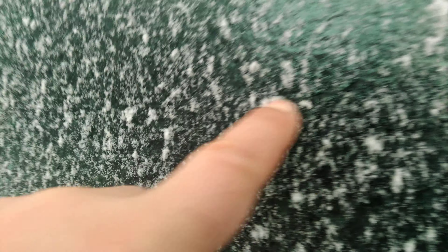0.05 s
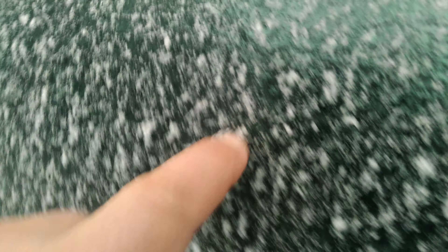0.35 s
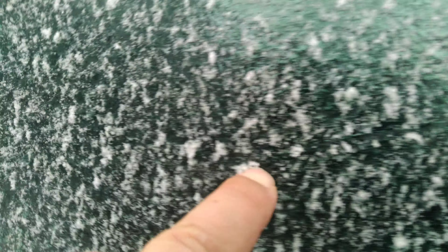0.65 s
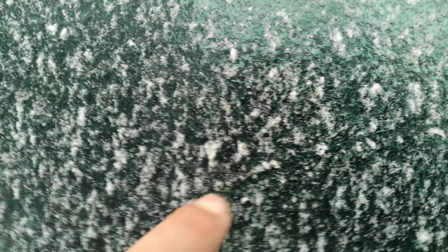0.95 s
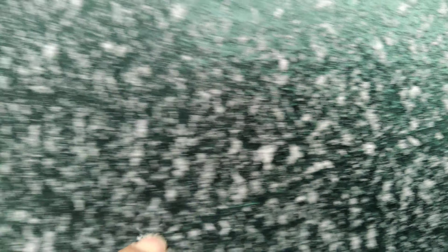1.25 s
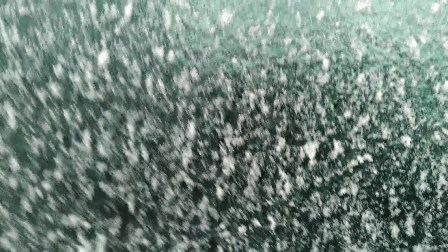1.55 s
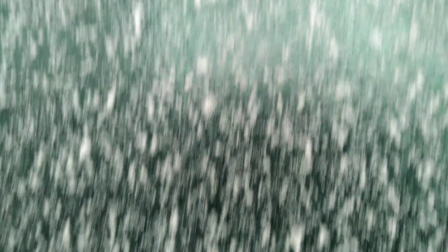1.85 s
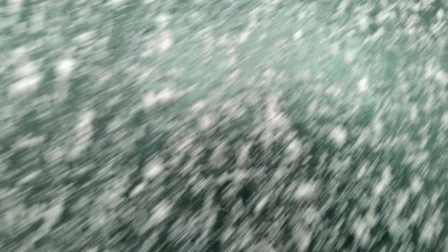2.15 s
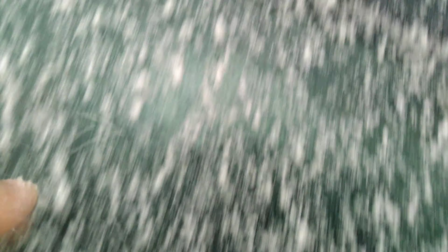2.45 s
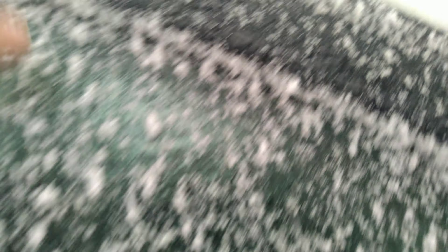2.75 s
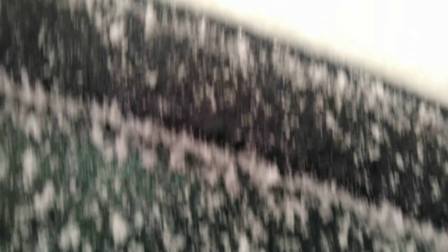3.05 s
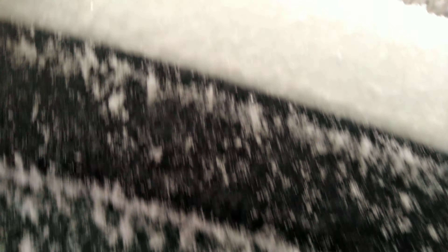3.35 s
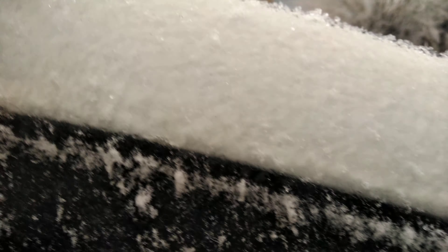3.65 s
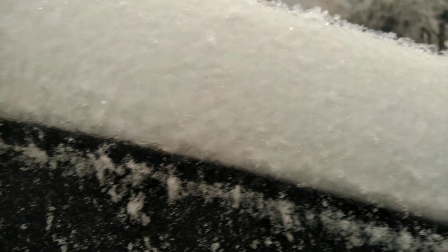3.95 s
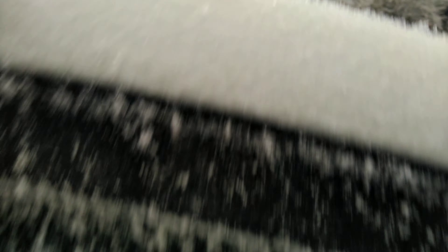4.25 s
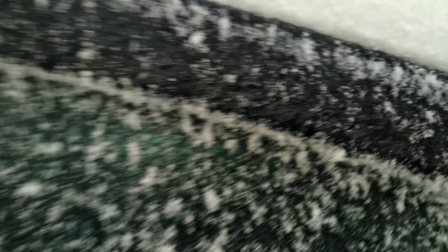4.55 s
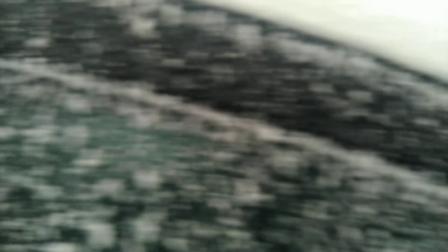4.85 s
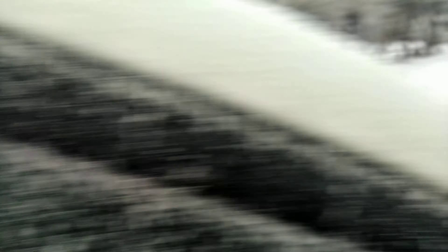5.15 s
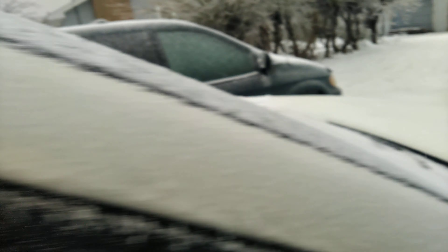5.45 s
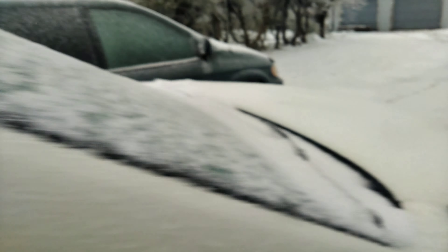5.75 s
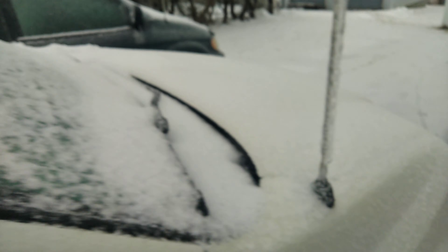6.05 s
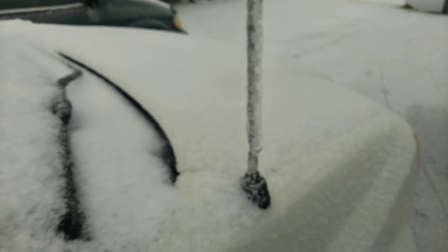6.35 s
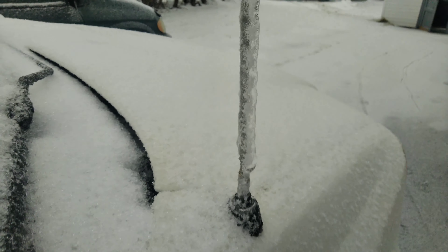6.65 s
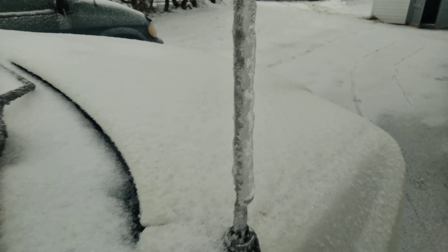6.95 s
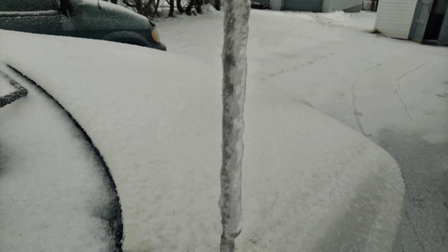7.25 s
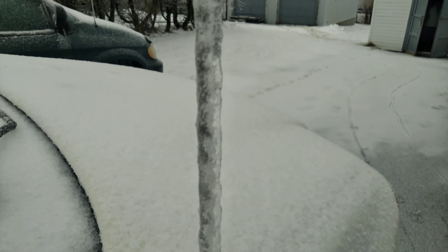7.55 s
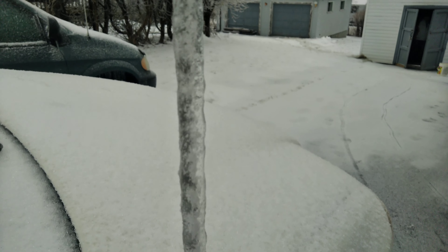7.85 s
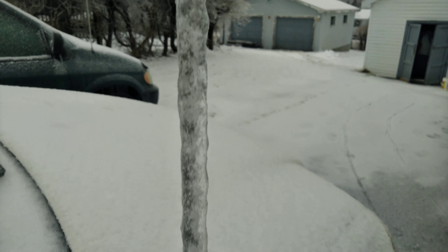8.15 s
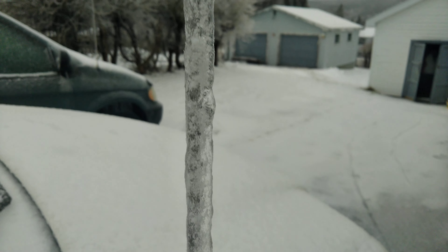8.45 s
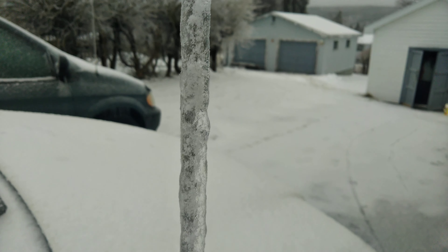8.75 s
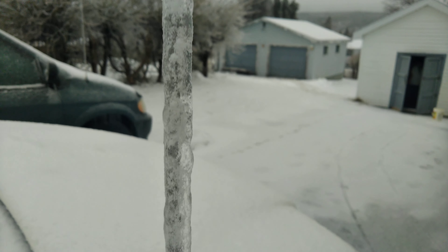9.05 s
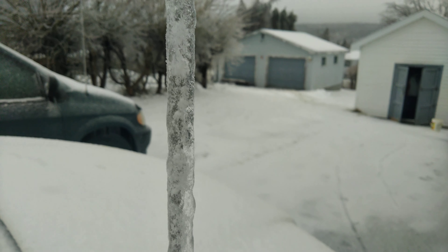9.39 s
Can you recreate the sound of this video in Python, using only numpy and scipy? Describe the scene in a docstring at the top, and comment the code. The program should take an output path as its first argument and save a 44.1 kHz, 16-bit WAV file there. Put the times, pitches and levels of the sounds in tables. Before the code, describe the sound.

A finger scratches crackling ice on a car windscreen, making the glass boom dully, while freezing rain ticks and hisses all around.

```python
"""At the iced windscreen of a parked car in freezing rain, heard from a phone held close to the glass.
Ice pellets click on the crust and tap the bodywork, over a fine patter of countless far impacts.
At first a finger scratches the crust, and its stick-slip friction sets the pane booming. Brittle ice
ticks and snaps close by, a hand brushes and bumps the case, and later a sleeve slides past the right
microphone port. Eddies of a light wind rumble throughout."""
import sys
import numpy as np
from scipy import signal
from scipy.fft import rfft, irfft, next_fast_len
from scipy.io import wavfile
from scipy.ndimage import uniform_filter1d

SR = 44100
rng = np.random.default_rng(int(sys.argv[2]) if len(sys.argv) > 2 else 0)


def master_out(mix):
    """Clip the mix to full scale and print it as 16-bit PCM to the path in sys.argv[1]."""
    frames = np.transpose(np.atleast_2d(mix))
    ceiling = np.clip(frames, -1, 1)
    pcm = np.round(ceiling * 32767).astype(np.int16)
    wavfile.write(sys.argv[1], SR, pcm)


N = 415410
TIME = np.arange(N) / SR
TEN_MS = SR // 100


def undb(db):
    """Decibels to amplitude ratio. Levels in the tables are relative: each source adds its own gain."""
    return 10 ** (np.asarray(db) / 20)


def curve(table):
    """Linear interpolation of (seconds, value) rows over the whole scene."""
    return np.interp(TIME, *np.transpose(table))


def unit(x):
    """Normalisation to rms 1."""
    return x / np.sqrt(np.mean(x ** 2))


def impulse_level(x, db):
    """Energy normalisation: a short sound, spread over 10 ms, takes this level."""
    return x * undb(db) * np.sqrt(TEN_MS / np.mean(np.sum(x ** 2, axis=-1)))


def pan(db):
    """Constant-power gains for a balance, the left level minus the right, in dB."""
    return unit(undb(np.array([[db], [-db]]) / 2))


def colour(x, points):
    """Minimum-phase filter with the given (Hz, dB) response, made by folding the cepstrum."""
    hz, db = np.transpose(points)
    size = 2 * next_fast_len(x.shape[-1])
    log_hz = np.log(np.fft.rfftfreq(size, 1 / SR) + 1)
    cepstrum = irfft(np.log(undb(np.interp(log_hz, np.log(hz), db))))
    cepstrum[1:size // 2] *= 2
    cepstrum[size // 2 + 1:] = 0
    return irfft(rfft(x, size) * np.exp(rfft(cepstrum)))[..., :x.shape[-1]]


def wander(rate):
    """Smooth random modulation of rms 1, with `rate` new values a second."""
    hold = int(SR / rate)
    steps = np.repeat(rng.standard_normal(N // hold + 1), hold)
    return unit(uniform_filter1d(uniform_filter1d(steps, hold), hold)[:N])


def swell(start, hold, attack_s, release_s):
    """Envelope of linear rise, plateau and exponential decay."""
    age = TIME - start
    return np.clip(age / attack_s, 0, 1) * np.exp(-np.maximum(age - attack_s - hold, 0) / release_s)


def add(out, start, sound):
    """Superposition of a short sound from `start` seconds on."""
    i = int(np.clip(start * SR, 0, N - 1))
    out[:, i:i + sound.shape[-1]] += sound[..., :N - i]


def grains(rate, spread_db, tail_s, tail_db):
    """Shot noise: random impacts, mostly small, each with its own strength and scatter at each port."""
    size = (rng.random(N) < rate / SR) * undb(spread_db * np.minimum(rng.exponential(size=N), 4))
    hits = size * rng.choice([-1, 1], N) * undb(6.7 * rng.standard_normal((2, N)))
    decay = np.exp(-1 / (tail_s * SR))
    scatter = np.sqrt(signal.lfilter([1 - decay], [1, -decay], hits ** 2 + 1e-18))
    return unit(hits + undb(tail_db) * scatter * rng.standard_normal((2, N)))


def shifting_resonances(x, spread_db):
    """Random filtering: every few milliseconds another fragment sounds, with resonances of its own."""
    spectra = signal.stft(x, nperseg=256)[2]
    peaks = unit(uniform_filter1d(rng.standard_normal(spectra.shape[1:]), 4, axis=0))
    return signal.istft(spectra * undb(spread_db * peaks), nperseg=256)[1][:, :N]


# The patter, weaker as the phone is lifted from the glass. Each row: time in seconds, level in dB.
PATTER_LEVEL = [(0, -56.5), (2.85, -55.5), (3.5, -53.5), (5.3, -56), (5.9, -56.5), (8, -58.5), (9.4, -58)]
# Spectrum of the patter. Each row: frequency in Hz, spectral level in dB.
PATTER_SPECTRUM = [(200, 7), (400, 12.5), (800, 6.5), (1500, 6.5), (3000, 5), (6000, 3.5), (10000, 6),
                   (15500, 9.5)]


def patter(level_db=-3.5):
    """Incoherent summation: countless far pellets merge into a smooth hiss."""
    far = grains(rate=2500, spread_db=2.8, tail_s=0.0033, tail_db=9)
    hiss = unit(colour(far, PATTER_SPECTRUM))
    return hiss * undb(level_db + wander(7.4) + curve(PATTER_LEVEL)) * pan(-1.3)


# Gusts on the ports. Each row: time of the peak in seconds, half length in seconds, level in dB.
GUSTS = [(0.186, 0.076, -41.5), (0.69, 0.17, -44.5), (1.504, 0.33, -51), (2.496, 0.18, -50.5),
         (3.502, 0.4, -57.5), (4.19, 0.19, -50.5), (4.89, 0.35, -55.5), (6.72, 0.2, -52.5),
         (7.11, 0.1, -50), (7.757, 0.25, -56.5), (8.374, 0.14, -46), (8.77, 0.15, -50)]
# Spectrum of the eddies. Each row: frequency in Hz, spectral level in dB.
WIND_SPECTRUM = [(12, 0.5), (25, 2.5), (50, -1.5), (90, -9.5), (180, -26), (400, -62), (1500, -68)]


def wind(breeze_db=-64, flutter_db=4.5):
    """Turbulent pressure: eddies buffet each port independently and swell in gusts."""
    gust_power = sum(undb(db) ** 2 * np.exp(-((TIME - peak) / half) ** 2) for peak, half, db in GUSTS)
    strength = np.sqrt(undb(breeze_db) ** 2 + gust_power)
    eddies = unit(colour(rng.standard_normal((2, N)), WIND_SPECTRUM))
    return eddies * strength * undb(flutter_db * wander(6.5)) * pan(-8)


# Spectrum of the far neighbourhood. Each row: frequency in Hz, spectral level in dB.
MURMUR_SPECTRUM = [(30, 1), (70, 1), (120, 3), (200, -7.5), (350, -11.5), (700, -15), (1500, -42),
                   (4000, -71), (15000, -72)]


def neighbourhood(level_db=-66):
    """Coherence: a distant low murmur reaches both ports with nearly the same waveform."""
    noise = rng.standard_normal(N) + 0.13 * rng.standard_normal((2, N))
    return unit(colour(noise, MURMUR_SPECTRUM)) * undb(level_db) * pan(-3.5)


# Modes of the windscreen. Each row: frequency in Hz, level in dB, time to fall 60 dB in seconds.
PANE_MODES = [(84, -17, 0.11), (115.7, -2.5, 0.17), (131.9, -2, 0.19), (170, -7.5, 0.052),
              (190.6, 0, 0.082), (243, -10, 0.035), (304, -13, 0.058), (380, -7.5, 0.11),
              (437, -2.5, 0.065), (529, -4, 0.032), (590, -4, 0.054), (674, -8, 0.056), (798, -5, 0.043),
              (1070, 1, 0.031)]
# The boom deepens as the finger moves on. Each row: time in seconds, tilt in dB per octave.
BOOM_TILT = [(1.6, 3), (2.2, -9.5)]


def pane(start, scatter_db, hollow_hz, falloff_db_per_octave=10, left_lag_s=0.00038):
    """Modal response: a deep boom, and a hollow ring of the upper modes that the touched spot favours."""
    hz, db, t60 = np.transpose(PANE_MODES)
    upper = hz > 330
    db = db + scatter_db * rng.standard_normal(len(hz))
    db -= upper * falloff_db_per_octave * np.abs(np.log2(hz / hollow_hz))
    db += ~upper * np.interp(start, *np.transpose(BOOM_TILT)) * np.log2(hz / np.mean(hz[~upper]))
    age = np.maximum(np.arange(20 * TEN_MS) / SR - np.array([[left_lag_s], [0]]), 0)
    rings = np.array([np.sin(2 * np.pi * f * age) * undb(level) * np.exp(-np.log(1000) * age / decay)
                      for f, level, decay in zip(hz, db, t60)])
    # deep bass barely radiates
    rings = signal.sosfilt(signal.butter(2, 100, "high", fs=SR, output="sos"), rings)
    return rings[~upper].sum(axis=0), rings[upper].sum(axis=0)


# Strokes of the fingertip. Each row: start in seconds, hold in seconds, crunch level in dB,
# rub level in dB, judder depth in dB, centre of the hollow ring in Hz.
STROKES = [(0, 0.178, -48.5, -40, -0.5, 490), (0.242, 0.27, -48, -43, 1.5, 620),
           (0.508, 0.075, -50, -55, 8, 500), (0.64, 0.12, -49.5, -60.5, 0.5, 600),
           (0.766, 0.19, -44, -43, 6, 604), (0.974, 0.12, -50, -44, 0, 515),
           (1.113, 0.053, -45, -42, 4.5, 504), (1.188, 0.015, -41, -37, 6, 500),
           (1.231, 0.054, -47, -40.5, -2, 500), (1.297, 0.11, -54.5, -44.5, 1, 520),
           (1.405, 0.069, -43, -44.5, -2, 500), (1.528, 0.022, -52, -40, 1, 520),
           (1.611, 0.008, -53, -46, 7, 560), (1.667, 0.06, -53.5, -46.5, 0, 560),
           (1.734, 0.065, -60, -51.5, 7, 600), (1.906, 0.049, -45, -44.5, 10, 550),
           (2.069, 0.012, -63, -42, 10, 576), (2.103, 0.025, -44.5, -40, 2.5, 560),
           (2.15, 0.011, -45, -40, 0.5, 500), (2.182, 0.006, -61, -46, 7, 560),
           (2.203, 0.0096, -44.5, -41, 8, 560), (2.235, 0.13, -44.5, -36.5, 4, 546),
           (2.379, 0.011, -59, -36, 3, 550), (2.44, 0.014, -49, -38, 2, 450),
           (2.49, 0.052, -48, -37.5, 7, 397), (2.592, 0.13, -48.5, -38, 5.5, 400),
           (3.165, 0.021, -50, -68, 10, 400), (3.41, 0.017, -46.5, -69, 8, 402),
           (3.711, 0.069, -49, -59, 1, 400), (4.379, 0.018, -52, -73, -1, 396)]
# Dry hiss of skin gliding over ice. Each row: time in seconds, level in dB.
GLIDE_LEVEL = [(0, -50), (0.5, -45.5), (0.62, -51), (0.66, -44.5), (0.94, -48.5), (1.05, -80), (1.4, -51),
               (1.5, -69), (1.73, -58), (1.85, -81), (2.05, -68), (2.12, -81), (2.38, -65), (2.42, -80),
               (2.7, -67), (2.85, -99)]
# Spectra of the crunch and the glide. Each row: frequency in Hz, spectral level in dB.
CRUNCH_SPECTRUM = [(60, 5), (200, 15), (600, 2.7), (1200, 3), (3000, 5), (6000, 4.1), (10000, 3.4),
                   (15500, 2.3)]
GLIDE_SPECTRUM = [(200, -4), (1000, -3), (2500, -1), (4500, 4), (8500, 3), (15500, 2)]


def finger(crunch_db=-2, rub_db=-4, hollow_db=-1.5, judder_per_s=70, attack_s=0.0011, release_s=0.014):
    """Stick-slip friction: a fingertip hisses, breaks grains of crust and drives the pane's modes."""
    out = np.zeros((2, N))
    breaking = grains(rate=1700, spread_db=2.05, tail_s=0.003, tail_db=-0.51)
    crunch = colour(shifting_resonances(breaking, 4.7), CRUNCH_SPECTRUM)
    slips = grains(rate=1100, spread_db=1.4, tail_s=0.0018, tail_db=-7)[:1]
    # one contact makes crunch, rub and hiss, so they judder together
    judder = np.tanh(wander(judder_per_s)) + np.tanh(wander(4 * judder_per_s))
    for start, hold, crust_db, glass_db, judder_db, hollow_hz in STROKES:
        span = (TIME >= start) & (TIME < start + hold + 4 * release_s)
        grip = undb(judder_db * judder[span])
        deep, hollow = pane(start, 0, hollow_hz)
        response = deep + undb(hollow_db) * hollow
        rub = signal.fftconvolve(slips[:, span] * grip ** 0.38, response)[:, :len(grip)]
        crust = unit(crunch[:, span] * grip) * undb(crust_db + crunch_db)
        glass = unit(rub) * undb(glass_db + rub_db) * pan(-2.5)
        add(out, start, (crust + glass) * swell(start, hold, attack_s, release_s)[span])
    gliding = grains(rate=4000, spread_db=3.6, tail_s=0.0012, tail_db=1)
    hiss = unit(colour(shifting_resonances(gliding, 2.8), GLIDE_SPECTRUM))
    return out + hiss * undb(curve(GLIDE_LEVEL) + 2.7 * judder)


def faint_pellets(per_s=95, top_db=1, range_db=12):
    """Random arrivals: many fainter pellets whose level follows the patter, as rows like PELLETS."""
    when, small, bright, side = rng.random((int(per_s * N / SR), 4)).T
    db = curve(PATTER_LEVEL)[(when * (N - 1)).astype(int)] + top_db - range_db * np.sqrt(small)
    tilt_db = 2.5 + 8 * (2 * bright - 1)
    pan_db = -8.5 + 8 * (2 * side - 1)
    return list(zip(when * TIME[-1], db, tilt_db, pan_db))


# The clearest pellets landing on the crust. Each row: start in seconds, level in dB,
# tilt in dB per octave, balance in dB.
PELLETS = [(2.7964, -53.5, -8, 0), (3, -52.5, -1, -8), (3.05, -54, -3.5, -9), (3.1352, -46.5, -3, -4),
           (3.2807, -46.5, 0.5, 2), (3.503, -54, 2, -1.0), (3.5144, -46, 2, 4), (3.6858, -53, 8, 6),
           (3.736, -47, -1, -5), (3.7736, -46, 9, 2.0), (3.783, -51, 1, -5), (3.794, -55, 0, -9),
           (3.8653, -55.5, 3, -3), (3.8756, -49.5, 6, 3), (4.021, -49.5, 1.5, -10), (4.0307, -51, -5.5, -1),
           (4.1065, -51, -3, -8.0), (4.1603, -42.5, -1.5, -1), (4.2368, -48, 9, -9), (4.246, -52, 7, 2),
           (4.2985, -45, 0, -7), (4.4175, -47.5, 3, 9), (4.4584, -47.5, 1.5, -5), (4.5467, -51, 5, -5),
           (4.6428, -50.5, 4.5, -2), (4.7208, -52.5, 1.5, -4), (4.7773, -53, -2.5, -1),
           (4.828, -47, 1.5, -3), (4.9311, -50, -2.5, -6), (4.94, -50, 2, -2.0), (5.0918, -47, 4, -5),
           (5.121, -52, -1, -5), (5.2303, -52.5, 18, -4), (5.2384, -50, 1, -3), (5.2664, -45, 0, -8),
           (5.3196, -49.5, -2, -10), (5.3561, -50, 8, -13.0), (5.3886, -51, -2.5, -8),
           (5.4037, -46, 1.5, -5), (5.5672, -54, 3, -5), (5.801, -53, 1.5, -2), (5.9957, -52, -3.5, -5),
           (6.0196, -49, 0.5, -11), (6.063, -51, 0.5, -9), (6.1969, -48.5, 4, -6.0),
           (6.2616, -50, 3.5, -13), (6.2742, -45.5, -2, -6), (6.3134, -52, -2, -7), (6.364, -57, -5.5, -10),
           (6.7363, -48.5, 2, -11), (6.9055, -46.5, -1, -8), (6.9787, -44, 1.5, -12), (7.088, -49, 2, -7),
           (7.244, -51, 15, -10.0), (7.386, -53, -5, 1), (7.406, -50, -1, -9), (7.551, -51, 0.5, -9.0),
           (7.742, -52.5, -2.5, -6), (7.7673, -52, 2.5, -9), (7.904, -54.0, -1.5, -7),
           (8.0005, -53, 3, -6.0), (8.013, -51, -0.5, -11), (8.173, -51, 14, -8), (8.2801, -49, -1.5, -10),
           (8.482, -49.5, -2, -3.5), (8.5581, -47, -0.5, -6), (8.712, -50.5, -2.5, -8),
           (8.7888, -54, -2, -2.0), (8.9277, -52.5, -2.5, -6), (9.006, -51, -2.5, -4), (9.1256, -51, 1, -9),
           (9.2047, -51, -2, -9), (9.2508, -54, -5, -6.0), (3.8118, -54.5, 10, -13), (3.9417, -62, 7, -9),
           (4.055, -58, 19, -6), (4.176, -53, -2, -10), (4.5328, -54.5, 2.5, -11), (4.9617, -53, 1, -5),
           (4.9985, -54, 7, -13), (5.5755, -53, 11, -4), (5.615, -53.5, 6, -14), (5.7603, -57, 4, -12),
           (7.803, -54, 3.5, -7), (8.0305, -52.5, 0.5, -12), (8.0383, -52.5, -2.5, -2),
           (8.433, -52.5, 1.5, -8), (8.5022, -56, 5, -14), (8.7762, -55, 0, -13), (8.8445, -53, 7, -15)]
# Spectrum of a nearby pellet. Each row: frequency in Hz, spectral level in dB.
PELLET_SPECTRUM = [(150, -16.5), (600, -6.5), (1200, -1.5), (2000, -1.5), (3200, -0.5), (5500, 1.5),
                   (9000, 2), (14000, -1.5), (20000, -36)]


def pellets(level_db=1, contact_s=0.00047, scatter_s=0.0053, ring_hz=3600, cycles=0.99, bounce_db=-13):
    """Inelastic impact: each pellet gives a dry click, a brief ring, scattered crumbs and one bounce."""
    out, t = np.zeros((2, N)), np.arange(TEN_MS) / SR
    hz, spectrum_db = np.transpose(PELLET_SPECTRUM)
    octaves = np.log2(np.clip(hz, 1200, 10000) / 3000)
    for start, db, tilt_db, pan_db in PELLETS + faint_pellets():
        click = rng.standard_normal((2, len(t))) * np.sqrt(t) * np.exp(-t / contact_s)
        scatter = rng.standard_normal((2, len(t))) * np.exp(-t / scatter_s)
        shape_db = spectrum_db + tilt_db * octaves + 4.5 * rng.standard_normal(len(hz))
        # the duller the pellet, the lower it rings
        pitch = np.clip(ring_hz * 2 ** (tilt_db / 6 + 0.44 * rng.standard_normal()), 1200, 10000)
        ring = np.sin(2 * np.pi * (pitch * t + rng.random((2, 1)))) * np.exp(-t * pitch / cycles)
        impact = impulse_level(click, 0) + impulse_level(ring, -6) + impulse_level(scatter, -7)
        impact = colour(impact, np.column_stack([hz, shape_db]))
        impact = impulse_level(impact, db + level_db) * pan(pan_db)
        add(out, start, impact)
        add(out, start + 0.004 + 0.021 * rng.random(), impact * undb(bounce_db))
    return out


def faint_taps(per_s=6.3, level_db=-7.5, ring_hz=1850):
    """Jittered arrivals: one weaker tap in each equal slot of time, as rows like BODYWORK_TAPS."""
    count = round(TIME[-1] * per_s)
    starts = TIME[-1] * (np.arange(count) + rng.random(count)) / count
    size, pitch, side = rng.standard_normal((count, 3)).T
    db = curve(PATTER_LEVEL)[(starts * SR).astype(int)] + level_db + 3 * size
    return list(zip(starts, db, ring_hz * 2 ** (0.28 * pitch), -7 + 5 * side))


# The loudest pellets on the bodywork. Each row: start in seconds, level in dB, ring frequency in Hz,
# balance in dB.
BODYWORK_TAPS = [(3.0935, -46.5, 1410, -5), (2.127, -50, 1850, 0), (4.89, -54, 1400, -8),
                 (3.7671, -45.5, 1777, -16), (4.7419, -45, 1480, -17), (4.861, -47, 2070, 2),
                 (4.9515, -44, 1780, 4), (5.273, -52, 1320, -5), (6.0135, -48, 1280, -6),
                 (6.4272, -41, 1500, -1.5), (6.551, -47.5, 1990, -8), (6.664, -40, 1030, -3),
                 (6.7863, -45, 1230, -4), (6.87, -49, 1620, -3.5), (6.962, -46, 1460, -4),
                 (7.535, -45.5, 2480, -10), (7.9827, -45.5, 1480, -4), (8.652, -46.5, 2940, -1),
                 (8.939, -49, 1750, -12)]


def bodywork_taps(level_db=-1, cycles=1.65, click_db=-3, click_s=0.002, left_lag_s=0.00033):
    """Damped oscillation: a pellet clicks on snow-damped metal, whose ring fades in a cycle or two."""
    out, t = np.zeros((2, N)), np.arange(TEN_MS) / SR
    age = np.maximum(t - np.array([[left_lag_s], [0]]), 0)
    for start, db, hz, pan_db in BODYWORK_TAPS + faint_taps():
        ring = np.sin(2 * np.pi * hz * age) * np.exp(-age * hz / cycles)
        click = rng.standard_normal(ring.shape) * np.exp(-t / click_s)
        tap = impulse_level(ring, db + level_db) + impulse_level(click, db + click_db)
        add(out, start, tap * pan(pan_db))
    return out


# The nail catches hard on the crust. Each row: release time in seconds, boom level in dB,
# knock level in dB, centre of the knock in Hz, rasp level in dB.
NAIL_CATCHES = [(0.143, -41, -45, 650, -43.5), (0.214, -45, -43, 560, -48), (0.287, -66, -42.5, 660, -44),
                (0.311, -65, -43, 600, -40), (0.411, -39.5, -47, 600, -42), (0.45, -43, -36.5, 600, -49),
                (0.46, -34.5, -39, 630, -39.5), (0.762, -29.5, -33.5, 520, -36.5),
                (0.79, -38, -45, 598, -36), (0.857, -46, -38, 700, -36.5), (1.123, -41.5, -55, 590, -40.5),
                (1.205, -40, -40.5, 503, -39), (1.273, -47, -45, 497, -41), (1.345, -49, -45, 520, -46),
                (1.404, -49, -45, 560, -56), (1.44, -29, -34, 454, -40.5), (1.455, -33, -36.5, 600, -43),
                (1.542, -45, -43, 500, -43), (1.551, -41, -35, 510, -39), (1.576, -52, -53, 520, -50),
                (1.594, -38.5, -56, 400, -58), (1.623, -43, -42, 553, -44), (1.803, -42, -56, 600, -53),
                (1.851, -44.5, -58, 600, -67), (1.92, -36, -54, 550, -50), (1.963, -39, -46, 550, -53),
                (2.081, -35, -50, 580, -70), (2.16, -49, -59, 403, -47.5), (2.249, -39, -45, 600, -44),
                (2.294, -40, -43, 495, -57), (2.357, -41.5, -48, 550, -49), (2.446, -38.5, -41, 480, -41),
                (2.495, -42, -53, 416, -49), (2.591, -47, -43.5, 420, -45), (2.655, -44, -42, 398, -59),
                (2.746, -43, -45, 400, -44)]
# Spectrum of the rasp. Each row: frequency in Hz, spectral level in dB.
RASP_SPECTRUM = [(40, -65), (150, 1), (400, 2), (700, 9), (1200, -2), (2000, -1), (4000, -8), (9000, -9.5)]


def nail_catches(level_db=-1, knock_trim_db=-1.5, grip_s=0.0017, slip_s=0.0051, chatter_s=0.0054):
    """Stick and release: the nail grinds, then lets go in a chatter of slips that sets the pane booming."""
    out, t = np.zeros((2, N)), np.arange(8 * TEN_MS) / SR
    lead_s = 0.01  # the grinding begins before the release
    age = t - lead_s
    grind_envelope = np.exp(-np.abs(age) / np.where(age < 0, grip_s, slip_s))
    for release, boom_db, knock_db, hollow_hz, rasp_db in NAIL_CATCHES:
        deep, hollow = pane(release, 2, hollow_hz)
        chatter = rng.laplace(size=len(t)) * np.exp(-t / chatter_s)
        push = impulse_level(1.0 * (t == 0), 0) + impulse_level(chatter, -1)
        knock = signal.fftconvolve(hollow, push[None])
        grind = (rng.standard_normal(len(t)) + rng.laplace(size=(2, len(t)))) * grind_envelope
        rasp = colour(grind, RASP_SPECTRUM)
        add(out, release, impulse_level(deep, boom_db + level_db) * pan(-3.5))
        add(out, release, impulse_level(knock, knock_db + knock_trim_db) * pan(-1))
        add(out, release - lead_s, impulse_level(rasp, rasp_db + level_db) * pan(-0.71))
    return out


def shard_spectrum(tilt_db, crumble_s, low_hz=900, grain_hz=1050, resonance_db=4):
    """Radiation from a small source: a shard gives little bass and has resonances of its own."""
    hz = np.geomspace(110, 21000, 20)
    db = tilt_db * np.log2(np.clip(hz, 3000, 10000) / 6000)
    db -= 10 * np.log10(1 + low_hz / hz)
    db -= 10 * np.log10(1 + (grain_hz / hz) ** 4 / (1000 * crumble_s))
    db += resonance_db * rng.standard_normal(len(hz)) / (1 + (hz / 9000) ** 2)
    # the highest treble is rolled off, so each crack keeps its level
    db -= 10 * np.log10(1 + (hz / 16500) ** 12)
    return np.column_stack([hz, db])


# The loudest cracks of ice close by. Each row: start in seconds, level in dB,
# crumbling time in milliseconds, tilt in dB per octave, balance in dB.
ICE_CRACKS = [(0.169, -37.5, 1.9, 2, -3), (0.1756, -39.5, 1.75, 4.5, 2), (0.2, -40.5, 0.97, 1, 1),
              (0.2816, -35, 6, 2.5, -2), (0.291, -37, 1.2, 8, -1), (0.3134, -33, 1.34, 1, -3),
              (0.331, -44, 1.4, 3, -7), (0.441, -39, 2.2, 3, -6), (0.543, -44, 1.13, 2, -1),
              (1.033, -45.5, 4, -5, 0), (1.2613, -46, 1.2, 3, -7), (1.5772, -44, 0.99, -2, -1),
              (2.4974, -41, 1.86, 1.5, -5), (2.519, -47, 0.91, 1, -6), (0.345, -35, 2.3, 5, 0),
              (0.4099, -32.5, 0.8, 6.5, -4), (0.4496, -34, 4.2, -0.5, 0), (0.489, -43, 2, -1, 6),
              (0.5133, -29, 0.59, 10.5, -1.5), (0.852, -34, 2.2, -3, 8), (0.893, -34, 1.4, 9, -1),
              (0.924, -40, 1.6, 6, -4), (0.9383, -36, 3.2, 6, 3), (1.008, -40.5, 1.3, 30, -5),
              (1.12, -43, 4.4, 6, 4), (1.145, -42.5, 1.2, 7, 0), (1.2022, -37, 4.4, -2.5, 0),
              (1.2354, -37, 2.2, 0.5, 0), (1.345, -37.5, 2.55, 2.5, 0), (1.362, -41, 1.4, 2, 1),
              (1.402, -33, 1.38, 5.5, -2.5), (1.438, -35, 3.3, 3.5, 0), (1.456, -40, 1.9, 2, 0),
              (1.508, -43, 1.33, -0.5, 4), (1.54, -42, 2.2, 0, -1), (1.643, -31.5, 1.8, 4, -5),
              (1.9178, -38, 2.2, 8, -6), (2.08, -35.5, 4.2, 2.5, -6), (2.2048, -39.5, 2.5, 5, -8),
              (2.237, -39.5, 2.6, 7.5, -11), (2.258, -40.5, 4.6, 3, -8), (2.283, -38, 4.3, 4, -3),
              (2.386, -34, 3.1, 8, -7), (2.448, -36.5, 7.7, 1, -4.5), (2.589, -36.5, 4.5, 4, -8),
              (2.637, -37, 3.3, 11, -4.5), (2.654, -39, 0.99, 11, -1), (2.6895, -36.5, 0.93, 3, -12),
              (2.744, -41.5, 1.45, 0, -13), (3.0704, -33.5, 0.34, 12.5, -5), (3.1615, -36.5, 0.15, 15, -10),
              (3.1684, -40, 7.9, 2.5, 0), (3.2088, -39.5, 0.71, 0, -1), (3.253, -45.5, 1.1, -6.5, -8),
              (3.3076, -39.5, 2, 2.5, 0.5), (3.3438, -38.5, 0.63, 19, 0), (3.37, -33, 0.63, 8, -1),
              (3.396, -42, 0.2, 14, -1), (3.3981, -43, 0.32, 8, -4), (3.4006, -46, 0.57, 2, -1),
              (3.4126, -40.5, 1.4, 6, -2), (3.4312, -44, 0.29, 12, 4), (3.4328, -36.5, 0.75, 1.5, 1),
              (3.467, -38.5, 0.63, 2, 5), (3.4956, -41.5, 3.3, 2, -4), (3.6216, -33.5, 0.5, 3.5, -7),
              (3.667, -39, 0.73, 6.5, 2), (3.7283, -36, 0.89, 15, -2), (3.749, -40.5, 2.14, 7, -9),
              (4.139, -42, 0.62, 10, -17), (4.2714, -41, 0.74, 6, -25), (4.308, -40, 5.6, 4, -6),
              (4.375, -33, 2.8, 4.5, -3), (4.384, -37.5, 2.7, 5, 4), (4.6003, -30, 0.65, 9, 1),
              (4.606, -27.5, 2.7, 12, -14), (4.614, -28.5, 3.2, 10, -6), (5.0153, -43.5, 0.39, 14, -11),
              (5.107, -41, 2.06, 1, -9), (5.1356, -37, 0.27, 47, -20), (5.74, -44, 1.22, -3.5, -8),
              (5.9637, -41, 4.3, 3, 0), (7.6377, -43.5, 0.74, 0, -10), (7.891, -47.5, 1.63, 1.5, -8),
              (8.2077, -48.5, 1.14, 4, -8), (8.5662, -47, 3.1, -5, -5), (8.6432, -48, 1.4, 3, -16),
              (8.835, -48, 1.76, 0.5, -9), (9.1823, -47, 3.3, -1, -8)]


def ice_cracks(fragments=9, tail_s=0.003, debris_s=0.0043):
    """Brittle fracture: ice is crushed for a moment, then cracks; fragments skitter over the glass."""
    lead_s = 0.003  # the crushing begins before the crack
    out, t = np.zeros((2, N)), np.arange(5 * TEN_MS) / SR - lead_s
    after, onset = t >= 0, np.searchsorted(t, 0)
    for start, db, crumble_ms, tilt_db, pan_db in ICE_CRACKS:
        crumble_s = crumble_ms / 1000
        fracture = np.zeros((2, len(t)))
        for port in fracture:
            breaks = onset + (rng.random(fragments) * crumble_s * SR).astype(int)
            np.add.at(port, breaks, rng.standard_normal(fragments) * rng.random(fragments))
            port[onset] += 1.95 / np.sqrt(1 + crumble_s / 0.00014)  # a quick break starts harder
        dust_s = np.where(after, crumble_s, 0.71 * crumble_s)
        dust = rng.laplace(size=fracture.shape) * np.exp(-np.abs(t) / dust_s)
        tail = rng.standard_normal(fracture.shape) * np.exp(-np.abs(t) / tail_s) * after
        # loose crumbs land one by one; a longer crumble sheds more of them
        crumbs = rng.standard_normal(fracture.shape)
        crumbs *= undb(9 * np.minimum(rng.exponential(size=len(t)), 5))
        crumbs *= np.exp(-np.abs(t) / debris_s) * after
        debris = impulse_level(crumbs, -14) * np.sqrt(crumble_s / 0.00026)
        burst = impulse_level(fracture, 0) + impulse_level(dust, -3) + impulse_level(tail, -15) + debris
        crack = colour(burst, shard_spectrum(tilt_db, crumble_s))
        add(out, start - lead_s, impulse_level(crack, db) * pan(pan_db))
    return out


# Hand and cloth brush the phone. Each row: start in seconds, level in dB, length in seconds,
# centre frequency in Hz.
BRUSHES = [(1.655, -55.5, 0.11, 1090), (5.57, -60.5, 0.06, 828), (5.725, -57, 0.06, 710),
           (5.955, -49, 0.029, 950), (6.418, -47, 0.085, 1100), (6.661, -50, 0.03, 960),
           (7.025, -44.5, 0.047, 1070), (7.062, -47.5, 0.044, 960), (7.088, -52, 0.032, 108)]


def brushes():
    """Friction noise: soft contact with the case makes a short, dull swish."""
    out = np.zeros((2, N))
    for start, db, length, hz in BRUSHES:
        noise = rng.standard_normal(20 * TEN_MS) + 0.5 * rng.standard_normal((2, 20 * TEN_MS))
        band = [(hz / 8, -12), (hz / 2, -3), (hz, 0), (hz * 1.2, -3), (hz * 3, -18), (hz * 10, -40)]
        swish = unit(colour(noise, band))
        window = np.sqrt(np.hanning(int(length * SR)))
        add(out, start, swish[:, :len(window)] * window * undb(db))
    return out


# Snaps of the ice sheet. Each row: start in seconds, level in dB, nominal pitch in Hz, balance in dB.
FLAKE_SNAPS = [(3.203, -44.5, 2055, -15), (3.208, -52, 2060, -3), (3.3075, -48, 2330, 1),
               (3.3429, -41, 1950, -10.5), (3.3684, -44, 2280, -5), (3.412, -48, 2150, -6),
               (3.4275, -47, 2170, -2), (3.4328, -46, 2230, -18), (3.4674, -45, 2100, -6),
               (3.4946, -56, 2150, -1), (3.6217, -45.5, 2100, -6), (4.308, -56, 1880, -5),
               (4.374, -52, 1620, -10)]
# Modes of a flake. Each row: multiple of the pitch, level in dB, time to fall 60 dB in seconds.
FLAKE_MODES = [(1, -2, 0.037), (2.02, -4, .01), (2.72, -3, .014)]


def flake_snaps(level_db=1, rise_per_s=18, bend_s=0.008, left_lag_s=0.00019):
    """Free vibration: a snapping flake rings briefly, its modes bending upwards as it springs free."""
    out, t = np.zeros((2, N)), np.arange(4 * TEN_MS) / SR
    age = np.maximum(t - np.array([[left_lag_s], [0]]), 0)
    for start, db, hz, pan_db in FLAKE_SNAPS:
        phase = 2 * np.pi * hz * age * (1 + rise_per_s * np.minimum(age, bend_s) / 2)
        detunings = 1 + 0.02 * rng.standard_normal(len(FLAKE_MODES))
        ring = sum(np.sin(ratio * detune * phase) * undb(level) * np.exp(-np.log(1000) * age / t60)
                   for (ratio, level, t60), detune in zip(FLAKE_MODES, detunings))
        add(out, start, impulse_level(ring, db + level_db) * pan(pan_db))
    return out


# Dull knocks of the hand on the case. Each row: start in seconds, level in dB, frequency in Hz.
CASE_BUMPS = [(4.2709, -43.5, 300), (5.9601, -44, 445), (5.9658, -52, 650), (5.752, -53, 380),
              (6.664, -52, 330), (6.671, -56, 520)]


def case_bumps(cycles=0.35):
    """Heavy damping: the case is pushed and swings back once, without ringing on."""
    out, t = np.zeros((2, N)), np.arange(3 * TEN_MS) / SR
    for start, db, hz in CASE_BUMPS:
        swing = np.sin(2 * np.pi * hz * t) * np.exp(-t * hz / cycles)
        add(out, start, impulse_level(swing, db) * pan(-2))
    return out


# Slides of the sleeve. Each row: start in seconds, rise in seconds, hold in seconds, level in dB.
SLEEVE_SLIDES = [(6.191, 0.075, 0.14, -37.7), (6.447, 0.041, 0.31, -44), (6.888, 0.1, 0.082, -41),
                 (7.722, 0.22, 0.12, -56.5)]
# Spectrum of the rubbing cloth. Each row: frequency in Hz, spectral level in dB.
SLEEVE_SPECTRUM = [(150, -0.5), (500, -6), (1400, -7.5), (2300, -4), (3800, -1), (6000, 0), (8000, 2),
                   (11500, 4.5), (15500, -5.5)]


def sleeve(level_db=-5, release_s=0.22):
    """Sliding friction: fibres snag and slip beside the right port; overlapping slides add in power."""
    power = sum((undb(db) * swell(start, hold, rise, release_s)) ** 2
                for start, rise, hold, db in SLEEVE_SLIDES)
    snags = grains(rate=3200, spread_db=1.5, tail_s=0.0018, tail_db=1)
    fibres = unit(colour(shifting_resonances(snags, 1.9), SLEEVE_SPECTRUM))
    return fibres * np.sqrt(power) * undb(level_db + 0.89 * wander(45)) * pan(-8)


def scene():
    """Superposition: the pressures of all sources add at the two ports."""
    ice = patter() + pellets() + ice_cracks() + flake_snaps() + bodywork_taps()
    touch = finger() + nail_catches() + sleeve() + brushes() + case_bumps()
    return ice + touch + wind() + neighbourhood()


# Responses of the two microphone ports. Each row: frequency in Hz, gain in dB.
LEFT_PORT = [(500, -2), (1100, -1.5), (2100, 2.5), (3500, -4.5), (5200, -2), (7000, 2), (9300, 0),
             (12000, -1.5), (15500, 1.5)]
RIGHT_PORT = [(500, 0), (3500, -1), (5200, 0.5), (7000, 2), (9300, 9.5), (12000, 3), (15500, -3)]


def record(dry):
    """Port resonance: each port colours the sound, the right one brightly; a low-pass cuts the top."""
    top_hz = 15750
    heard = np.array([colour(dry[0], LEFT_PORT), colour(dry[1], RIGHT_PORT)])
    return signal.sosfilt(signal.ellip(8, 0.2, 70, top_hz, fs=SR, output="sos"), heard)


dry = scene()
out = record(dry)
master_out(out)
```